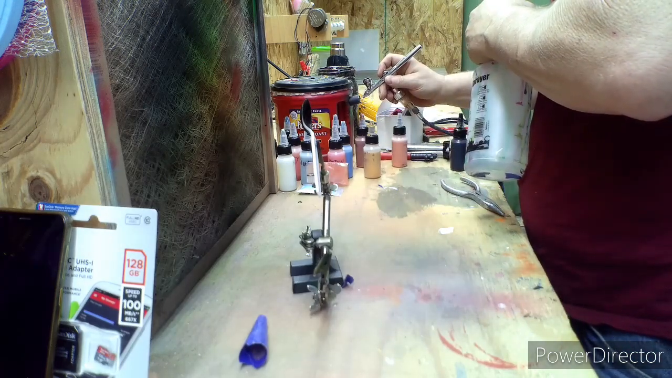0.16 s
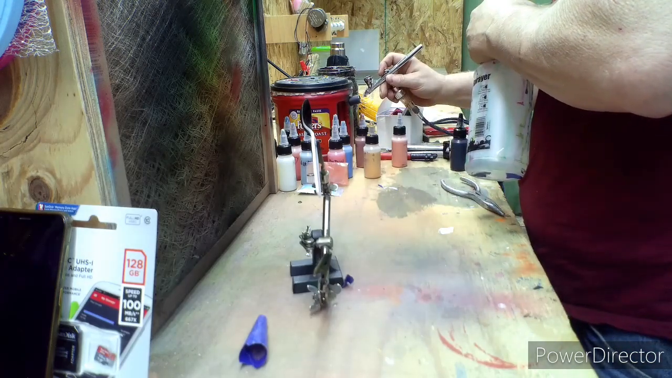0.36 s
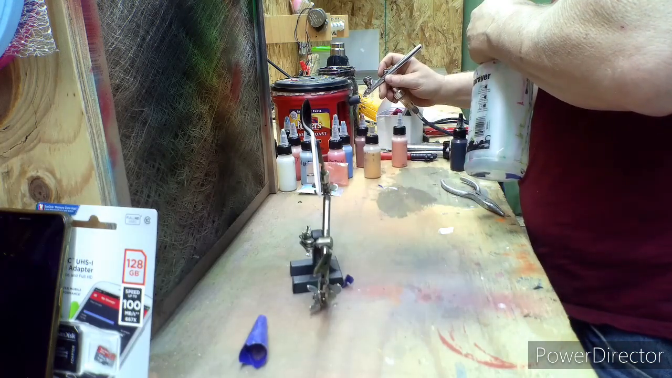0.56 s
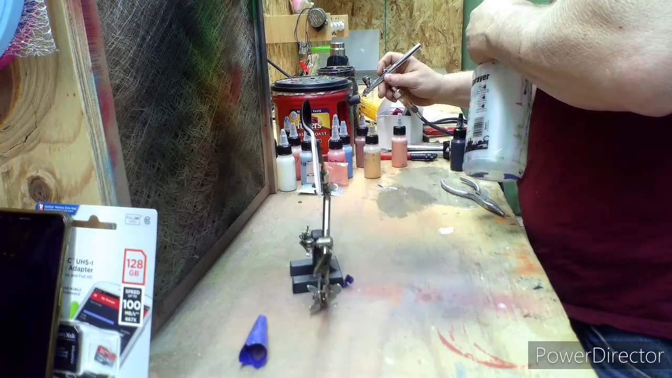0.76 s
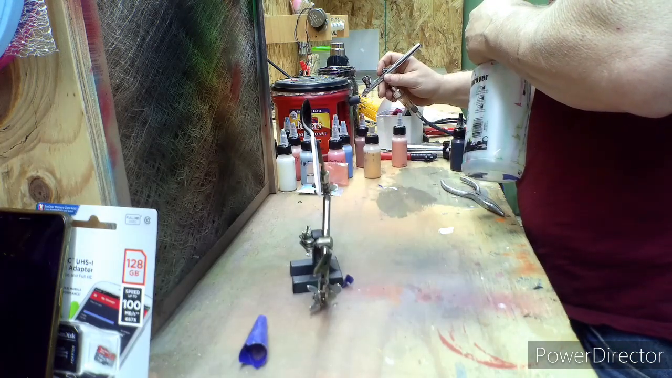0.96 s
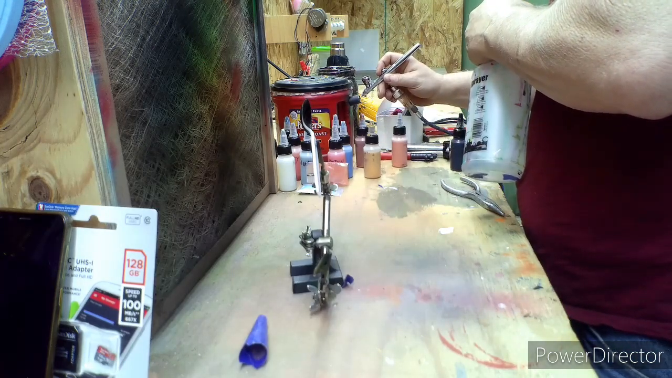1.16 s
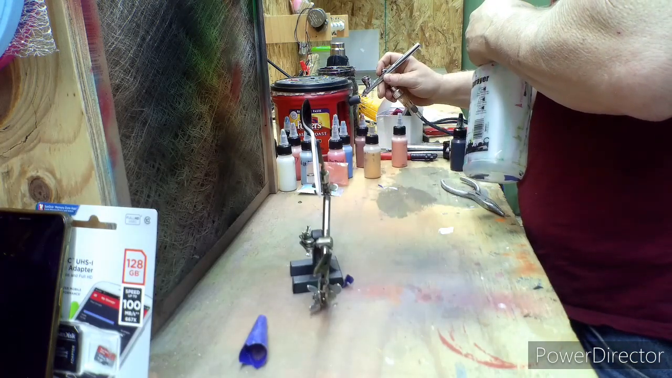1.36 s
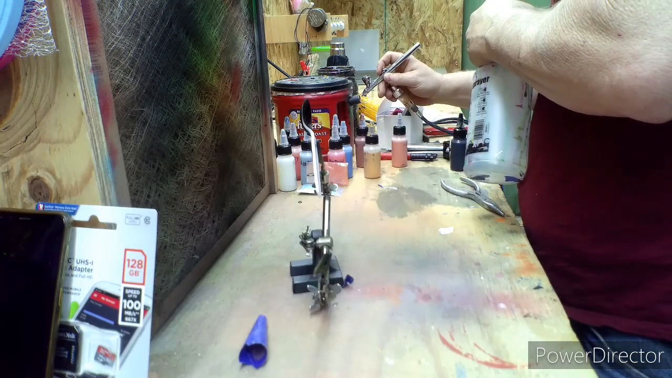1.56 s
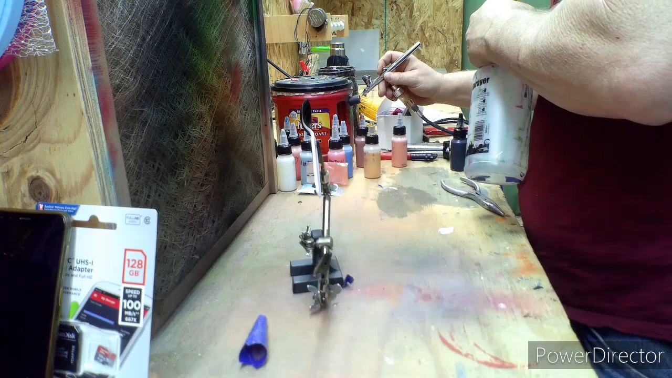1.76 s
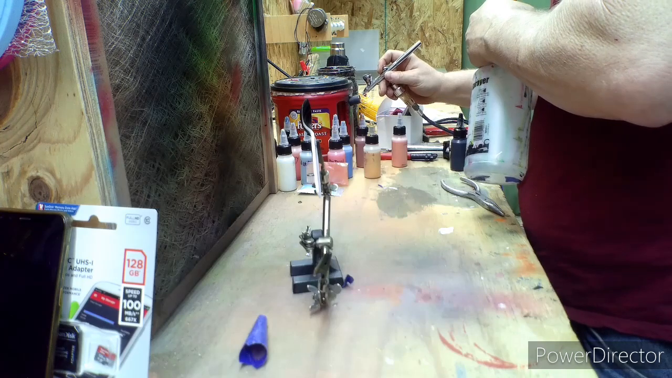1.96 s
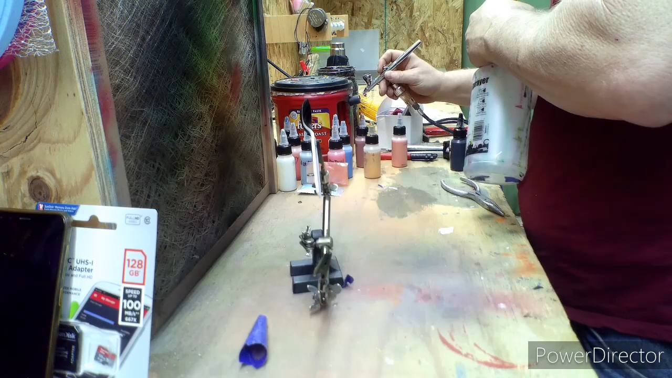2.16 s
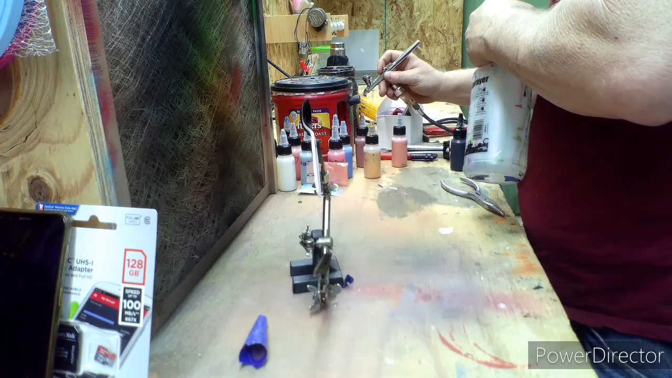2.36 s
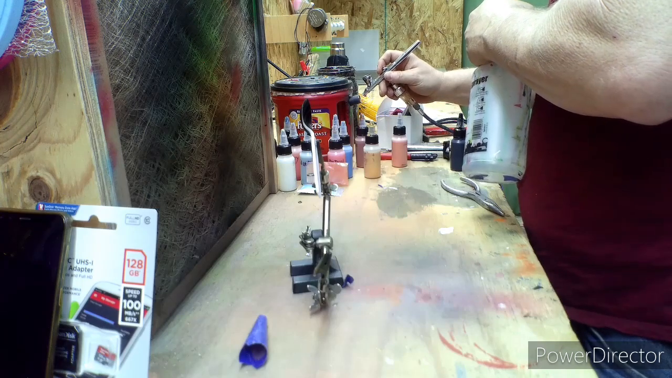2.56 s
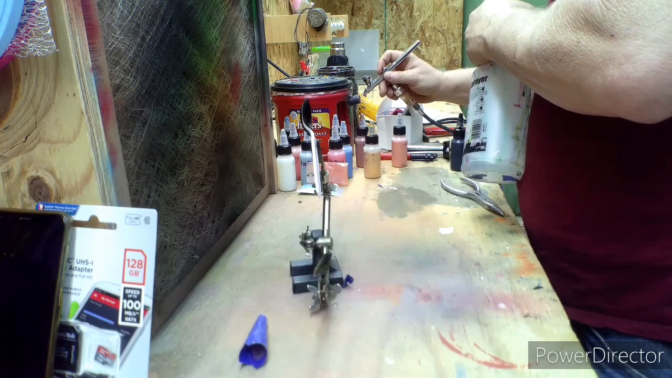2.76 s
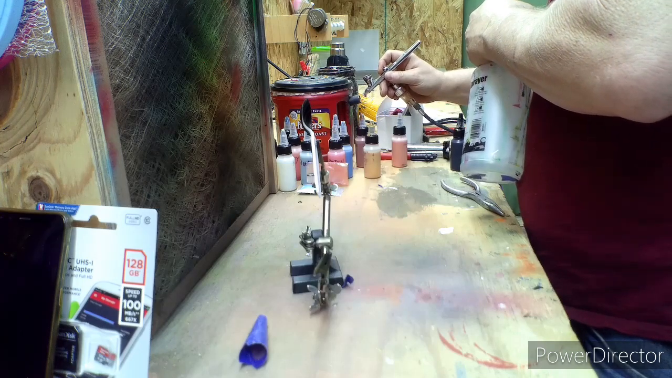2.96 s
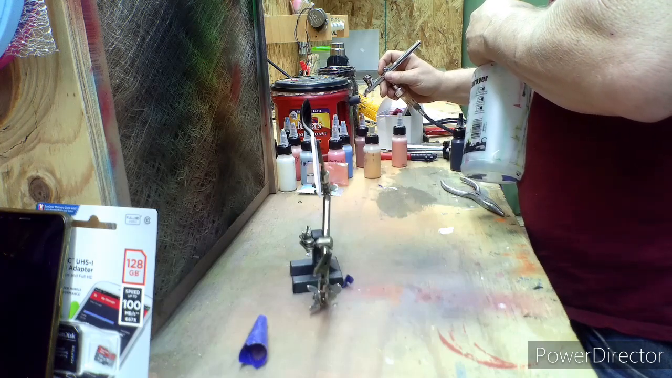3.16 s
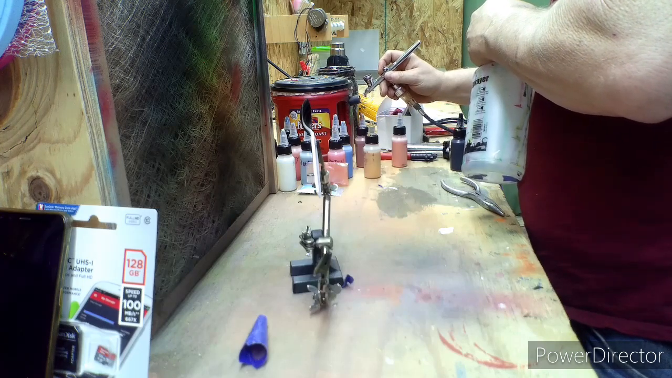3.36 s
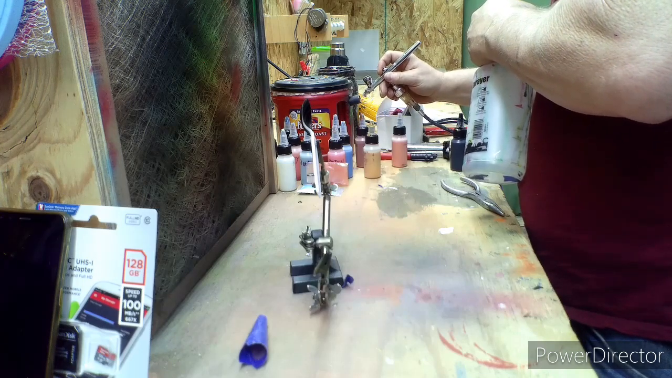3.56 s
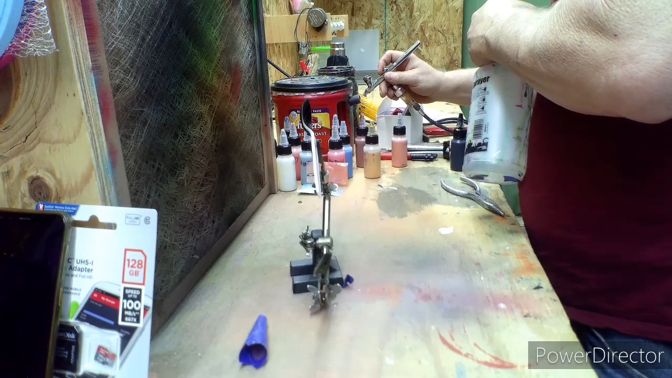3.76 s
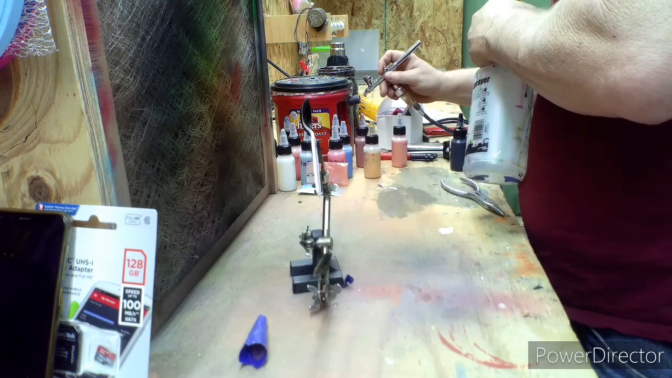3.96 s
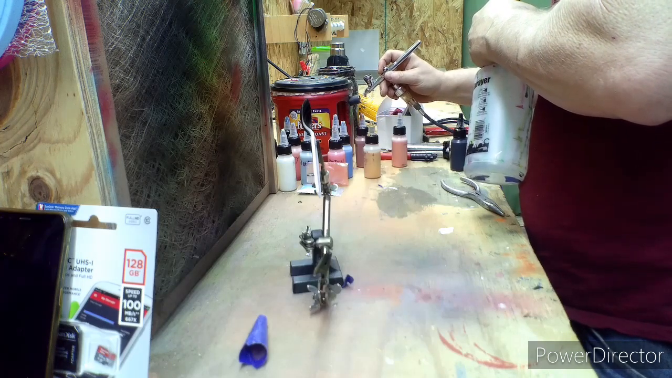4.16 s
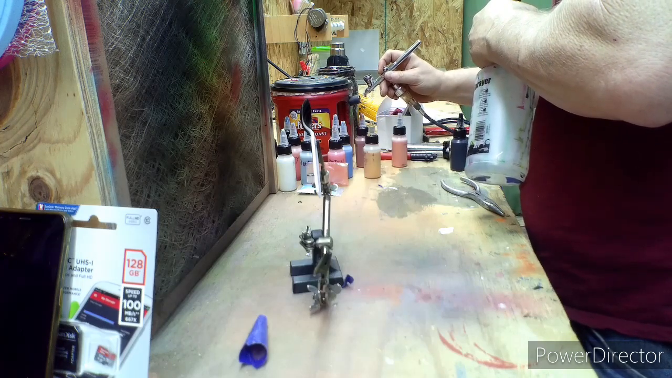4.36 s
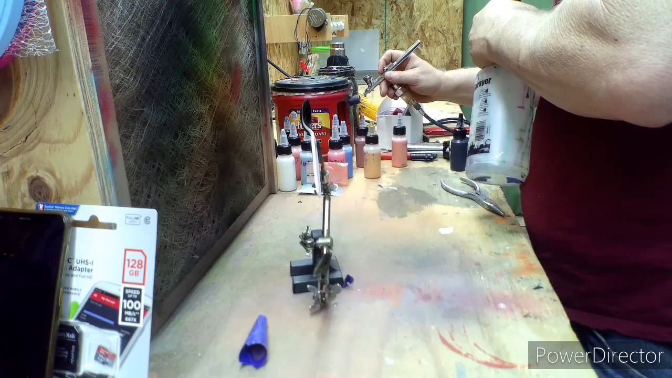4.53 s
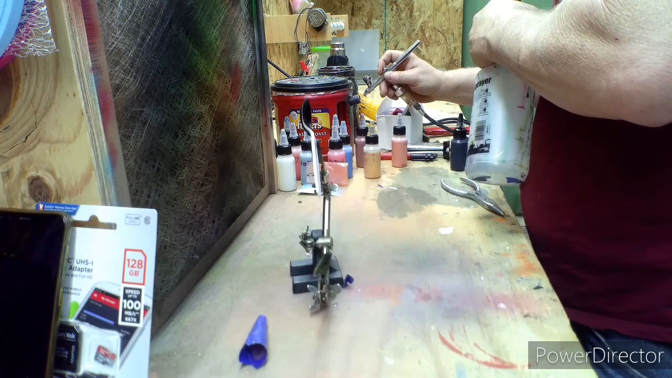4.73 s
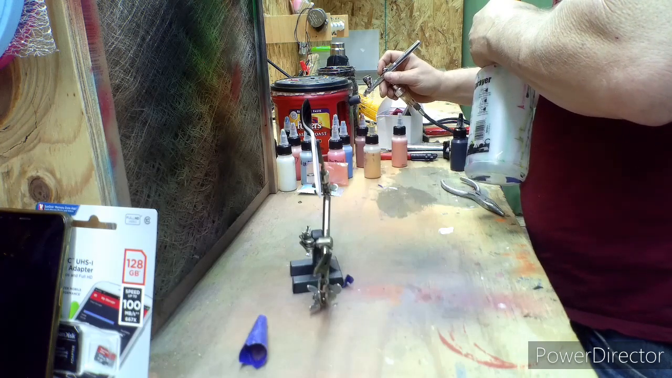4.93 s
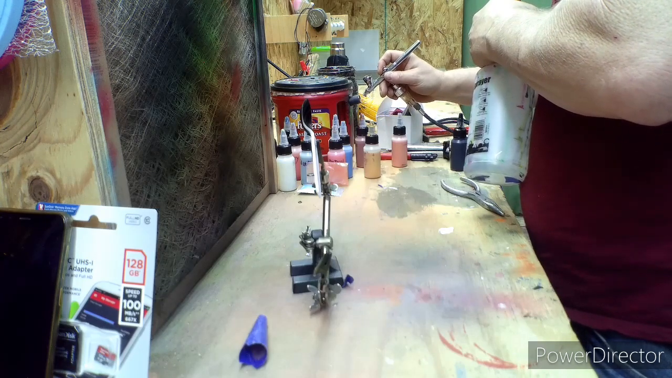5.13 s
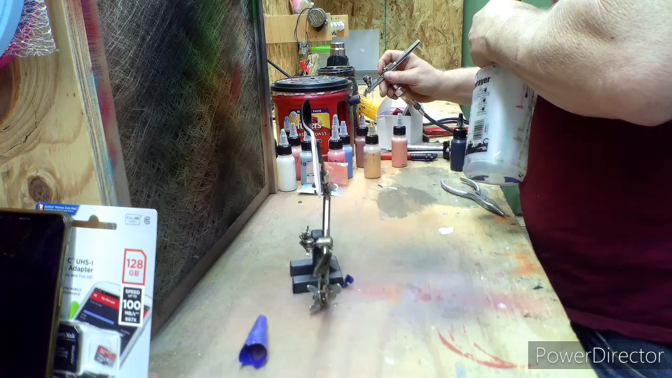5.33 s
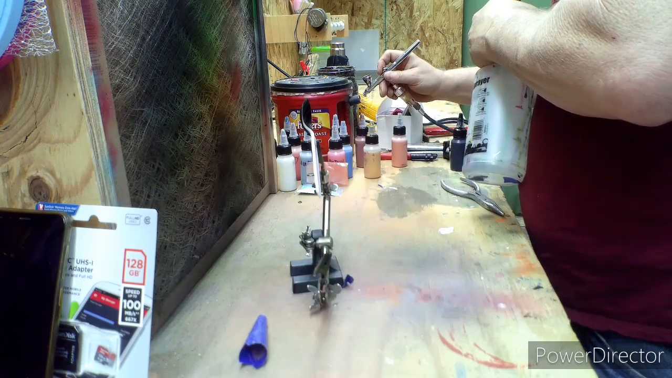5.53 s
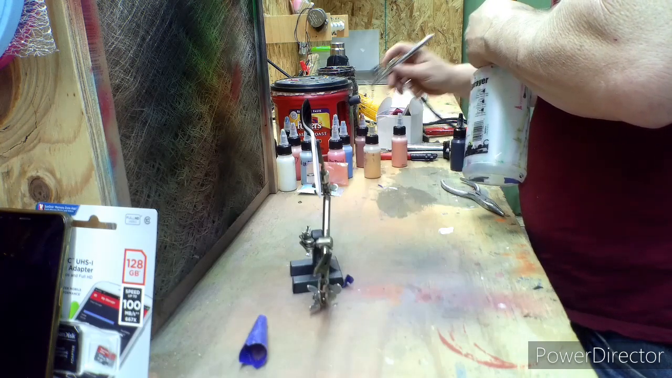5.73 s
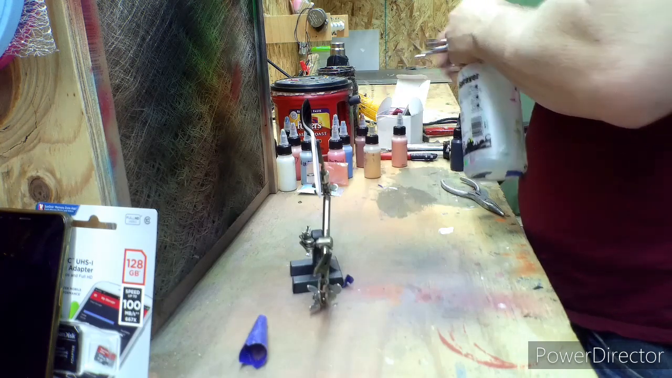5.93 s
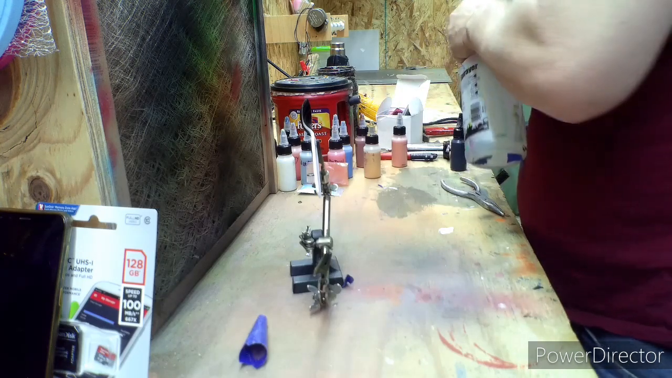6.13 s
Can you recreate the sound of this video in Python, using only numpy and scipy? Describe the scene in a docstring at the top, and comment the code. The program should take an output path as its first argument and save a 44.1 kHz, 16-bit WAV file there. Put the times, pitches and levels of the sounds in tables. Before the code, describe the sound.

From the start, a loud, steady airbrush hiss fills a small workshop, heard from one bench microphone, identical in both channels, with a short room reflection. The jet is bright and dense, with a whistling concentration in the upper mids and slight flutter. Around 1.5 seconds it turns subtly hollow; near 2.2 it swells brighter, and around 3.8 it gets a little fuller. Below it, a small piston compressor hums low with a rapid throb and soft housing chatter over dull background air. From about 5.4 seconds the trigger eases: the hiss flares near 5.6, sinks and dulls, spurts at 5.84 and shuts abruptly at 5.85, a brief weak leak ending around 5.95. Tiny metallic clicks come in close pairs at 5.92 and 5.95, then a much fainter tick at 6.15. Only the quiet hum and room remain.

```python
"""First heard is the steady hiss of an airbrush: jet turbulence excites the resonances of its nozzle.
Its colour shifts as the hand moves; the easing trigger makes it flare, dull, spurt and die away.
A small piston compressor hums at mains and shaft orders, and its puffs chatter in the housing.
After the valve shuts, the metal body rattles in two close pairs of small clicks and a fainter last one.
One microphone on the bench of a small workshop hears it all over a dull steady background."""
import sys
import numpy as np
from scipy import signal
from scipy.fft import rfft, irfft
from scipy.io import wavfile

SR = 44100
rng = np.random.default_rng(int(sys.argv[2]) if len(sys.argv) > 2 else 0)


def output_pcm(signal):
    """Save a mono or channel-first signal as 16-bit PCM at the path in sys.argv[1].

    Samples are clipped to [-1, 1] before scaling.
    """
    pcm = np.clip(np.atleast_2d(signal).T, -1, 1) * 32767
    wavfile.write(sys.argv[1], SR, np.round(pcm).astype(np.int16))


N = 272979
TIME = np.arange(N) / SR


def gain_of(db):
    """Level law: 20 dB is a factor of ten in amplitude."""
    return 10 ** (np.asarray(db) / 20)


def evened(x):
    """Power normalisation: scales a signal to rms 1."""
    return x / np.sqrt(np.mean(x ** 2) + 1e-20)


def read(points, hz):
    """Logarithmic pitch scale: interpolates (frequency [Hz], value) along log frequency."""
    f, value = np.transpose(points)
    return np.interp(np.log(hz + 1), np.log(f + 1), value)


def peaks(modes, hz):
    """Incoherent superposition: resonance powers add; a width is the offset where amplitude halves."""
    power = 0
    for f, width, db in modes:
        amplitude = gain_of(db) / (1 + ((hz - f) / width) ** 2)
        power = power + amplitude ** 2
    return np.sqrt(power)


def coloured(x, response, size=16384):
    """Minimum-phase principle: a log-amplitude response and its Hilbert transform give a causal filter."""
    hz = abs(np.fft.fftfreq(size, 1 / SR))
    log_gain = np.log(np.maximum(response(hz), 1e-5))
    spectrum = np.exp(np.conj(signal.hilbert(log_gain)))
    taps = np.fft.ifft(spectrum).real
    return signal.fftconvolve(x, taps[:size // 2])[:len(x)]


def wander(rate_hz, step=64):
    """Low-passed random process of rms 1, on a control grid that carries rates up to about 345 Hz."""
    count = N // step + 2
    hz = np.fft.rfftfreq(count, step / SR)
    spectrum = rfft(rng.standard_normal(count)) / (1 + (hz / rate_hz) ** 2)
    slow = irfft(spectrum)
    return evened(np.interp(TIME, np.linspace(0, TIME[-1], len(slow)), slow))


def bell(x, centre, width):
    """Gaussian weighting of height 1, falling to 1/e one width from its centre."""
    return np.exp(-((x - centre) / width) ** 2)


def ramp(x, start, length):
    """Linear transition from 0 to 1."""
    return np.clip((x - start) / length, 0, 1)


# broad turbulence of the jet: (frequency [Hz], relative spectral level [dB per Hz])
JET_SPECTRUM = [(300, -26.5), (800, -28), (1600, -26), (2700, -21.5), (3350, -22.5), (4900, -12.5),
                (5650, -17), (7500, -14.5), (9500, -11.5), (11500, -16), (13200, -14), (14200, -23),
                (15400, -23)]
# resonances of the nozzle and what it blows against: (frequency [Hz], width [Hz], relative level [dB])
NOZZLE_MODES = [(1170, 215, -20.9), (1954, 100, -14.9), (2117, 56, -12.0), (2195, 22, -7.7),
                (2230, 103, -11.9), (2417, 69, -14.8), (2978, 25, -19.9), (3520, 77, -22.6),
                (3837, 41, -14.3), (4058, 41, -8.1), (4202, 41, -3.9), (4318, 45, -3.9), (4382, 50, 0.0),
                (4447, 37, -1.9), (4524, 28, -2.6), (4626, 67, -4.7), (4793, 81, -7.2), (5331, 106, -9.6),
                (5859, 39, -12.3), (6290, 239, -14.4), (6563, 28, -4.4), (6652, 144, -6.4),
                (7171, 93, -6.6), (8240, 106, -13.4), (8788, 35, -10.1), (9005, 45, -8.6), (9669, 35, -9.5),
                (10493, 306, -9.0), (10856, 35, -8.9), (11380, 450, -11.1)]
JET_DB = -20  # rms of the whole jet before the room
SHUT_S, SHUT_T60 = 5.85, .05  # the air valve closes, and the jet decays by 60 dB [s]
BLEED_DB, BLEED_T60 = -11, .31  # the air left in the airbrush bleeds away [dB re open jet, s]
SEATED_S, SEAT_LENGTH_S = 5.94, .015  # the trigger seats and ends that leak


def airbrush(flutter_db=.5, sputter_db=.4):
    """Source-filter principle: turbulence, slightly fluttering, rings the nozzle until the valve shuts."""
    shut = np.maximum(TIME - SHUT_S, 0)
    leak = gain_of(BLEED_DB - 60 * shut / BLEED_T60)
    leak *= 1 - ramp(TIME, SEATED_S, SEAT_LENGTH_S)
    valve = np.maximum(gain_of(-60 * shut / SHUT_T60), leak)
    unsteadiness_db = flutter_db * wander(26) + sputter_db * wander(400)
    turbulence = rng.standard_normal(N) * gain_of(unsteadiness_db)

    def response(hz):
        return np.hypot(gain_of(read(JET_SPECTRUM, hz)), peaks(NOZZLE_MODES, hz))

    hiss = coloured(turbulence * valve, response)
    return gain_of(JET_DB) * evened(shaded(hiss))


SAG_DB_PER_S = .2  # the jet sags slowly as the pressure falls


def shaded(x):
    """Time-varying filtering: pressure, cavities, aim and trigger weight the short-time spectrum."""
    hz, t, z = signal.stft(x, SR, nperseg=1024, noverlap=768)
    hz = hz[:, None]
    db = cavity_db(hz, t) + aim_db(hz, t) + trigger_db(hz, t) - SAG_DB_PER_S * t
    return signal.istft(z * gain_of(db), SR, nperseg=1024, noverlap=768)[1][:N]


# the nozzle's two cavity tones about their usual level: (time [s], low tone [dB], main tone [dB])
CAVITY_LEVELS = [(0.06, -0.1, -1.5), (0.54, -1.6, 0.7), (0.94, -0.0, -0.5), (1.42, -2.5, -1),
                 (1.5, -0.8, -2.6), (1.58, -0.3, 0), (2.22, -0.8, 2), (2.3, 0.5, -0.2), (2.62, -1, 1),
                 (3.1, 1.9, -0.7), (3.18, 0.5, 0.5), (3.58, -0.5, -0.6), (3.74, 1.7, 1.5), (4.14, 0.5, 0.6),
                 (4.22, 2.5, 2), (4.46, 0, 0.2), (5.02, 3, 0.3), (5.4, 1.5, 0.3)]
LOW_HZ, LOW_WIDTH_HZ, MAIN_HZ, MAIN_WIDTH_HZ = 2250, 700, 4400, 700
SPURT_S, SPURT_HALF_S = 5.837, .019  # centre and half width of the last spurt
SPURT_DB, SPURT_MAIN_DB = 2.5, 6  # what it adds to the whole jet, and further to the main tone


def cavity_db(hz, t):
    """Cavity resonance: two tones rise and fall; the main one leaps with the last spurt."""
    s, *levels = np.transpose(CAVITY_LEVELS)
    low, main = (np.interp(t, s, level) for level in levels)
    main = main + SPURT_MAIN_DB * bell(t, SPURT_S, SPURT_HALF_S)
    return low * bell(hz, LOW_HZ, LOW_WIDTH_HZ) + main * bell(hz, MAIN_HZ, MAIN_WIDTH_HZ)


# what a full swell adds: (frequency [Hz], change [dB])
SWELL_COLOUR = [(3500, 0), (5200, 2), (5900, 0.5), (6800, 5), (8000, 2.5), (10300, 5.5), (11500, 1),
                (15000, 1)]
# notches of the hollow colour: (frequency [Hz], half width [Hz], change [dB])
HOLLOW_NOTCHES = [(3560, 380, -5), (5620, 150, -12.5)]
# moves of the hand; a negative notch share raises those bands instead:
# (time [s], rise [s], fall [s], share of swell [1], share of notches [1])
HAND_MOVES = [(.2, .3, .25, 0, .45), (1.45, 0.68, .65, 0.034, 1), (2.23, .42, 0.21, 0.99, 0),
              (3.8, .3, .38, .28, -0.51)]


def aim_db(hz, t):
    """Spectral shaping: each move of the hand brings a swell or a change of hollowness that comes and goes."""
    notches = sum(db * bell(hz, f, width) for f, width, db in HOLLOW_NOTCHES)
    total = 0
    for s, rise, fall, swell, hollow in HAND_MOVES:
        colour = swell * read(SWELL_COLOUR, hz) + hollow * notches
        total = total + bell(t, s, np.where(t < s, rise, fall)) * colour
    return total


# colour of the eased jet and of its flare: (frequency [Hz], eased change [dB], flare change [dB])
EASED_COLOUR = [(1200, 0, 0), (2200, -5, 5), (3300, -3, 3.5), (4400, -5, 4.5), (6240, -4.5, 0),
                (7800, -5, 8.5), (9500, -7.5, 0), (12000, -8.5, -1), (15000, -10, -2)]
EASE_S, EASE_LENGTH_S = 5.43, .35  # the trigger is eased back
FLARE_S, FLARE_HALF_S = 5.58, .11  # the hiss flares briefly on the way


def trigger_db(hz, t):
    """Flow control: easing the trigger makes the jet flare, sink and dull; it spurts before it shuts."""
    f, eased_points, flare_points = np.transpose(EASED_COLOUR)
    eased = read(list(zip(f, eased_points)), hz) * ramp(t, EASE_S, EASE_LENGTH_S)
    flare = read(list(zip(f, flare_points)), hz) * bell(t, FLARE_S, FLARE_HALF_S)
    return eased + flare + SPURT_DB * bell(t, SPURT_S, SPURT_HALF_S)


def workshop(x, wet_db=-5.5, count=5):
    """Superposition of direct sound and reflections, whose pattern changes slowly as the hand drifts."""
    place = np.linspace(0, count - 1, N)
    echoes = np.zeros(N)
    for k in range(count):
        # square-root shares crossfade the patterns at constant power
        share = np.sqrt(np.maximum(1 - abs(place - k), 0))
        echoes += signal.fftconvolve(x * share, reflections())[:N]
    return (x + gain_of(wet_db) * echoes) / np.hypot(1, gain_of(wet_db))


# reverberation: (frequency [Hz], time to decay by 60 dB [s])
ROOM_DECAY = [(150, .3), (2200, .25), (4400, .19), (7000, .21), (15000, .17)]


def reflections(gap=.003, echoes_per_s=2000, size=16384):
    """Exponential reverberant decay: sparse echoes of energy 1, each band dying at its own speed."""
    present = rng.random(size) < echoes_per_s / SR
    after_gap = np.arange(size) > gap * SR
    taps = rng.choice([-1., 1.], size) * present * after_gap
    hz, t, z = signal.stft(taps, SR, nperseg=256)
    decay = gain_of(-60 * t / read(ROOM_DECAY, hz)[:, None])
    tail = signal.istft(z * decay, SR, nperseg=256)[1]
    return tail / np.linalg.norm(tail)


# compressor tones: (multiple of the mains [1], multiple of the shaft added to it [1], rms level [dB])
HUM_TONES = [(0, 1, -66), (0, 3, -57), (2, -1, -51), (2, 0, -45.5), (2, 1, -49), (0, 6, -61), (2, 2, -56),
             (0, 8, -62), (4, 0, -59), (4, 1, -60), (6, 1, -61), (4, 9, -60), (0, 26, -62), (0, 27, -61),
             (0, 34, -61), (0, 35, -65), (0, 39, -64), (0, 40, -57), (0, 42, -57), (0, 43, -64),
             (0, 45, -56), (0, 46, -56), (0, 47, -63), (0, 48, -60), (0, 50, -63)]
MAINS_HZ, SHAFT_HZ = 60, 28.578


def hum(waver=.13, drift_turns=.0049):
    """Modulation sidebands: the piston's load flanks even mains multiples and adds shaft orders."""
    shaft = SHAFT_HZ * TIME + drift_turns * wander(1.5) + rng.random()
    out = np.zeros(N)
    for mains, order, db in HUM_TONES:
        # sidebands keep step with their tone, so the hum throbs once a turn; shaft orders start anywhere
        start = rng.random() * (mains == 0)
        turns = mains * MAINS_HZ * TIME + order * shaft + start
        tone = np.sqrt(2) * np.cos(2 * np.pi * turns)
        out += gain_of(db) * tone * (1 + waver * wander(12))
    return out


# resonances of the compressor housing: (frequency [Hz], width [Hz], relative level [dB])
HOUSING_MODES = [(126, 22, -6.5), (187, 21, -1.5), (235.7, 9.5, 9), (384.3, 11.4, 0), (523, 18.3, -1),
                 (630, 29, -2.5), (716, 44, -11.5), (911, 22, -4.5), (1082, 45, -15), (1356, 70, -11),
                 (1664, 110, -13)]


def chatter(level_db=-45, stroke_db=4, valve_db=3):
    """Forced resonance: intake and exhaust puffs, two in each shaft turn, shake the housing."""
    angle = 2 * np.pi * SHAFT_HZ * TIME
    puff_db = stroke_db * np.cos(angle) + valve_db * np.cos(2 * angle)
    puffs = rng.standard_normal(N) * gain_of(puff_db)
    return gain_of(level_db) * evened(coloured(puffs, lambda hz: peaks(HOUSING_MODES, hz)))


# still air of the workshop: (frequency [Hz], relative spectral level [dB per Hz])
FLOOR_SPECTRUM = [(20, -19), (50, -4), (70, -8), (120, -1.5), (300, 2), (700, -5.5), (1400, -11.5),
                  (2000, -7), (3200, -14.5), (6000, -22), (11500, -24), (13500, -41), (16000, -43)]


def floor(level_db=-49):
    """Stationary random noise: a spectral filter makes the dull steady background."""
    noise = rng.standard_normal(N)
    return gain_of(level_db) * evened(coloured(noise, lambda hz: gain_of(read(FLOOR_SPECTRUM, hz))))


# clicks of the trigger and the handle: (time [s], peak level before the room [dB])
CLICK_TIMES = [(5.9229, -22), (5.926, -28), (5.9477, -28.5), (5.951, -35), (6.151, -44)]
# what the metal body rings with: (frequency [Hz], width [Hz], relative level [dB])
BODY_MODES = [(4200, 930, 1), (5050, 250, 5), (6700, 500, -6), (8750, 480, 1), (11200, 1300, -1),
              (12900, 500, -10)]


def clicks(t60=.018, rise=.0008, size=4096):
    """Impact excitation: each click is a brief rattle of metal parts in the airbrush body."""
    out, t = np.zeros(N + size), np.arange(size) / SR
    rattle = np.tanh(t / rise) * gain_of(-60 * t / t60)
    for s, db in CLICK_TIMES:
        tick = coloured(rng.standard_normal(size) * rattle, lambda hz: peaks(BODY_MODES, hz))
        start = round(s * SR)
        out[start:start + size] += gain_of(db) * tick / abs(tick).max()
    return out[:N]


def scene(click_wet_db=-10):
    """Superposition at one microphone, alike in both channels; jet and clicks also excite the room."""
    jet = workshop(airbrush())
    compressor = hum() + chatter()
    background = floor()
    handling = workshop(clicks(), click_wet_db, count=2)
    mono = jet + compressor + background + handling
    return np.array([mono, mono])


EDGE_HZ = 15470  # upper band edge


def record(dry):
    """Band limitation: the recorder's linear-phase low-pass removes the highest treble."""
    taps = signal.firwin(767, EDGE_HZ, window=("kaiser", 9), fs=SR)
    return signal.oaconvolve(dry, taps[None], "same")


dry = scene()
out = record(dry)
output_pcm(out)
```